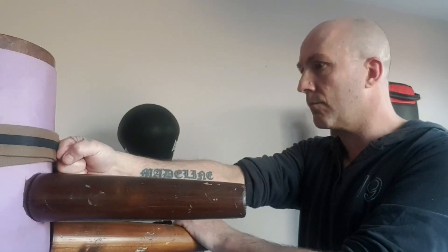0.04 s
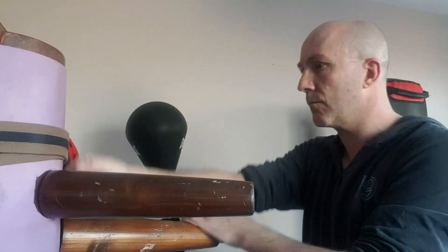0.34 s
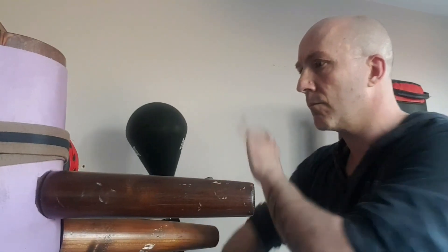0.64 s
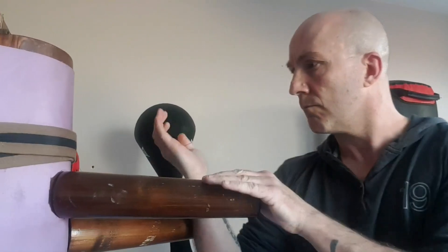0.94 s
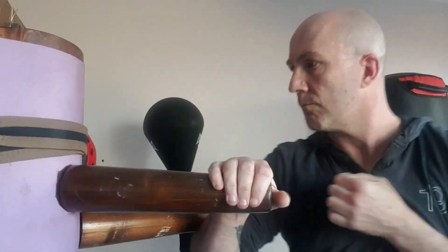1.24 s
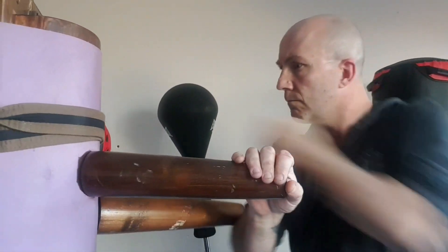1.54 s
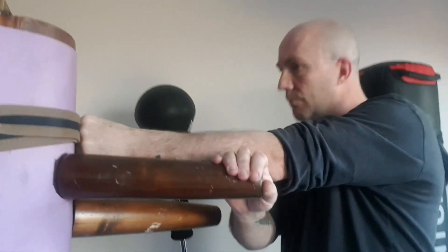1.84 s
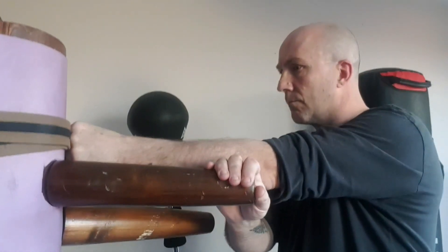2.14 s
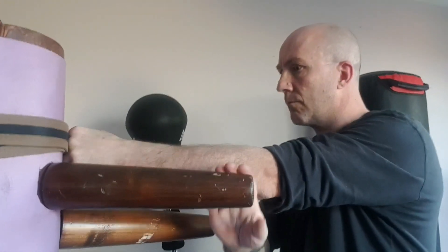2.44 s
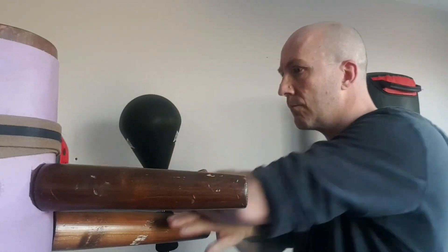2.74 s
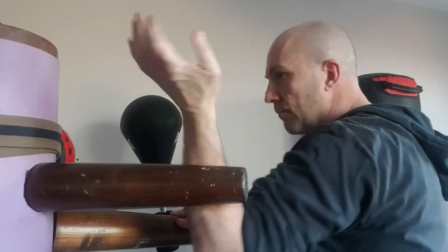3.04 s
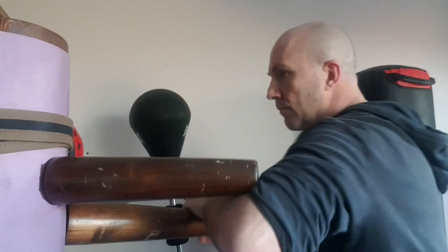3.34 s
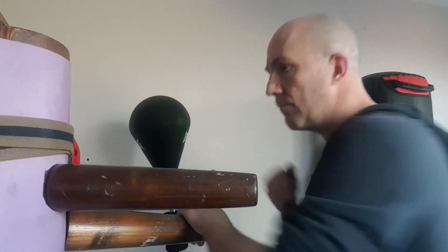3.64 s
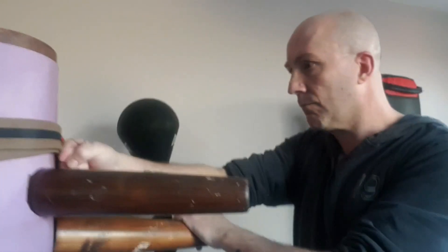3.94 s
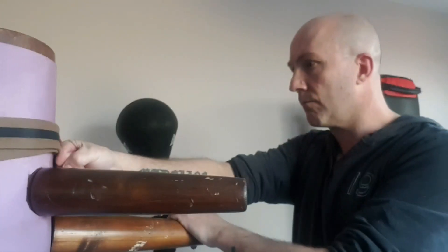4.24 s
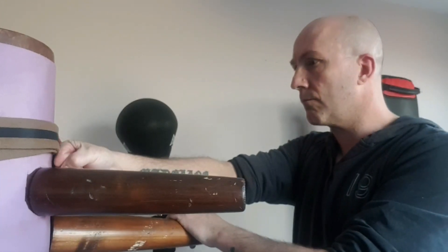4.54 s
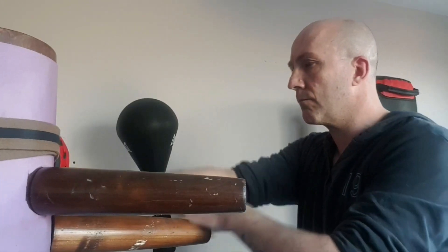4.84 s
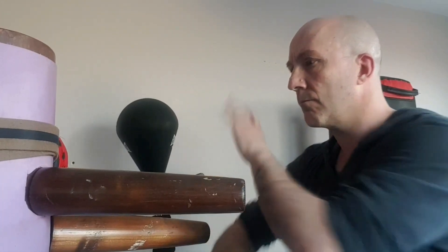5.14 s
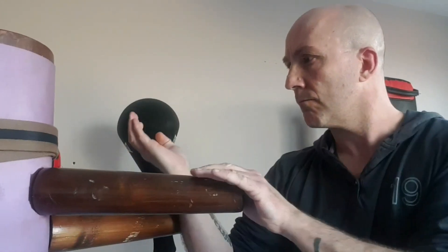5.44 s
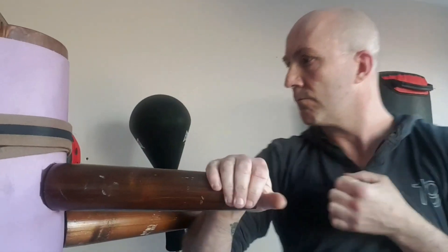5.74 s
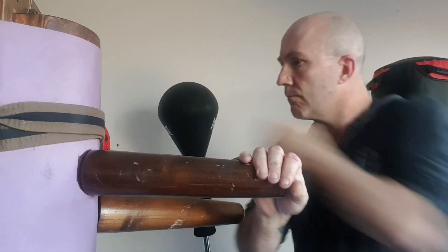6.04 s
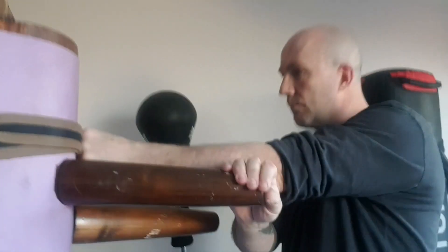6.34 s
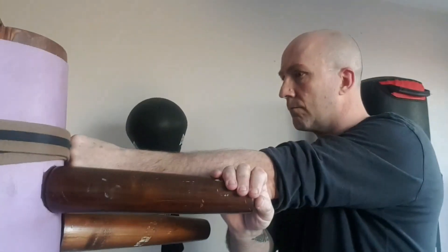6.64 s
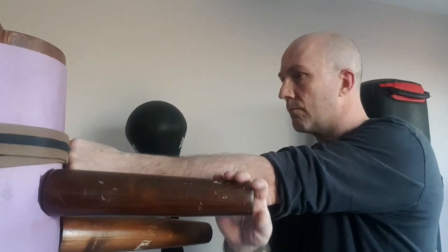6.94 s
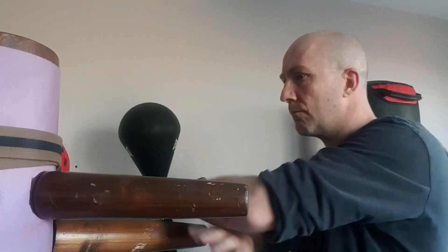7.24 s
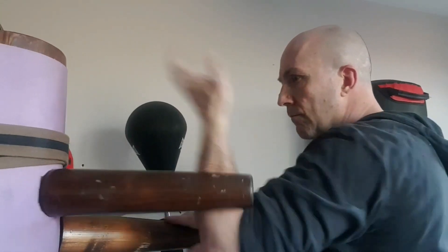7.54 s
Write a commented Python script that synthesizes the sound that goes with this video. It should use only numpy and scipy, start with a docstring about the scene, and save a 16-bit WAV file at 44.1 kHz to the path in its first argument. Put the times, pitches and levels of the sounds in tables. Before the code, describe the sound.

Someone drills on a wooden training dummy in a small, bare room. Forearms knock the loose wooden arms aside and skid along the varnish with slaps and brief squeaks. Three times, about two seconds apart, a fist follows with a deep thud on the padded trunk, which booms and sets the arms clattering. Sleeves rustle faintly between the blows. The microphone is close and picks up a short reverberation.

```python
"""Sleeves rustle and a hand brushes over wood; then knocks, slaps and squeaks follow as someone drills
on a wooden training dummy in a small, bare room. Impacts excite the modes of its loose arms, and skin
sliding on the varnish sounds by stick-slip friction. Three punches thud into the padded trunk, which
booms, sways on its mount and makes the arms clatter in their sockets. The walls reverberate."""
import sys
import numpy as np
from scipy import signal
from scipy.fft import rfft, irfft
from scipy.io import wavfile
from scipy.ndimage import uniform_filter1d

SR = 44100
rng = np.random.default_rng(int(sys.argv[2]) if len(sys.argv) > 2 else 0)


def generate_wav(sig):
    """Save sig (samples, or channels by samples) to the path in sys.argv[1] as 16-bit PCM at SR."""
    pcm = np.round(np.clip(np.atleast_2d(sig).T, -1, 1) * 32767).astype(np.int16)
    wavfile.write(sys.argv[1], SR, pcm)


N = 339129
T = np.arange(N) / SR
HZ = np.maximum(np.fft.rfftfreq(N, 1 / SR), 1)

# Reverberation time of the room: frequency_hz, t60_s
ROOM_T60 = [(60, 0.82), (250, 0.4), (800, 0.41), (2000, 0.39), (5000, 0.43), (14000, 0.26)]
# Left-right coherence of the diffuse field: frequency_hz, correlation
ROOM_COHERENCE = [(60, 0.73), (140, 0.8), (400, 0.67), (900, -0.096), (2000, -0.4), (14000, 0.94)]
# Spectral envelopes of the noise-like sounds: frequency_hz, relative_level_db
AIR_SPECTRUM = [(25, -19), (50, 5.5), (100, -5), (280, -14), (500, -11.5), (800, -2.5), (1400, -13.5),
                (3000, -14), (5000, -13.5), (9000, -16.5), (15000, -14.5)]
LINGER_SPECTRUM = [(250, -19), (550, -14.5), (750, -6.5), (1000, -8), (1400, -11.5), (8000, -37)]
CLOTH_SPECTRUM = [(40, -2.5), (320, 2.5), (500, 5), (850, 8), (1400, 3), (3000, 0), (4800, 0), (7000, -4),
                  (8700, -10), (12000, -1.5), (15000, -17)]
SNAP_SPECTRUM = [(200, -7.5), (800, 7.5), (1800, 1.5), (3000, 0.5), (6500, -1), (8500, -8.5), (12000, -3),
                 (15000, -14)]
PAT_SPECTRUM = [(30, 2.5), (70, -5), (130, -4.5), (250, -7.5), (500, -17), (1200, -18), (5000, -49.5)]
SLAP_SPECTRUM = [(80, -19.5), (330, -12), (480, -4), (800, 5), (1050, -2.5), (1450, 1), (1850, -5),
                 (2350, 1.5), (3000, -1.5), (4200, -5.5), (6500, -14), (9000, -26), (15000, -39)]
CLATTER_SPECTRUM = [(60, -21), (130, -7.5), (250, -9.5), (370, -10.5), (700, 0.5), (1000, -1), (1600, -6.5),
                    (2500, -9.5), (4000, -25), (6500, -35), (9000, -48.5), (15000, -41.5)]
# Normal modes of the trunk's sway, the arms and the padded trunk: frequency_hz, level_db, t60_s
SWAY_MODES = [(49.2, -4, 0.91), (95, -9.5, .75)]
ARM_MODES = [(446, -7, 0.38), (488, -7.5, 0.11), (554, -6.5, 0.11), (644.3, -8, 0.28), (728, -12, 0.076),
             (780.4, -4, 0.13), (829.4, 3.5, 0.12), (894, -0.5, 0.069), (1008.4, -5.5, 0.17),
             (1110, -16.5, .15), (1370, -19.5, 0.093), (1396, -13, .15), (1625, -10.5, 0.2),
             (1620, -21.5, 0.14), (2300, -10, 0.065), (3040, -13.5, .06)]
TRUNK_MODES = [(93.1, -9, 0.8), (126.4, -1, 0.31), (156.7, 5.5, 0.28), (229.5, -3.5, 0.28),
               (289.5, -5.5, 0.54)]
# Sleeve movements within one round of the drill: centre_s, level_db, half_length_s
SLEEVE_MOVES = [(.01, -66.5, 0.065), (0.436, -56, 0.079), (0.725, -64.5, 0.11), (1.261, -52.5, 0.11),
                (2.303, -68, 0.24), (2.475, -59.5, .095), (3.032, -52.5, 0.09), (3.345, -53, 0.14)]
# Skin snapping on or off the varnish, and clicks of the fittings:
# start_s, level_db, decay_s, tilt_db_per_octave
SNAPS = [(.752, -43, 0.022, 4.5), (1.1066, -42.5, 0.0014, -2.5), (1.1972, -38, 0.0034, 2),
         (1.647, -46, 0.023, -0.5), (2.2177, -47.5, 0.0043, 2), (2.473, -52, 0.0039, 2.5),
         (3.353, -33.5, .011, 1), (4.31, -48.5, 0.0034, -3), (5.565, -39.5, 0.0043, -0.5),
         (6.084, -50.5, 0.0087, -5), (6.364, -32.5, 0.0026, -2.5), (6.9051, -37, .0028, 0),
         (7.2129, -55, .0027, 1), (7.479, -39, 0.0051, 0.5)]
# A fist slides back off the dummy: start_s, level_db
SWIPES = [(0.483, -48.5), (5.022, -48.5)]
# A forearm leans on the wood: start_s, level_db
PRESSES = [(2.25, -49.5), (2.961, -50), (3.04, -42), (3.225, -49.5), (3.398, -43.5), (6.905, -57)]
# A palm comes down on the upper arm and pulls: start_s, level_db
GRABS = [(1.198, -39), (5.672, -42.5)]
# A hand rubs along an arm: start_s, level_db, rise_s, pitch_hz
RUBS = [(.435, -46.5, .024, 2110), (1.854, -29.5, 0.0025, 2960), (2.6, -64, .02, 1015),
        (3.262, -43, 0.024, 2300), (3.46, -33, .037, 2333), (3.642, -28.5, 0.0013, 2300),
        (7.1, -57.5, 0.0206, 1000)]
# A tugged or jogged arm knocks once in its socket: start_s, level_db, contact_s
SOCKET_KNOCKS = [(1.6435, -32, 0.0012), (2.239, -38.5, .0002), (2.920, -37.5, 0.0012),
                 (6.1335, -26, 0.00032), (6.1605, -12.5, .00063), (6.505, -48, 0.00065), (7.48, -49, .0003)]
# A forearm knocks an arm aside and skids along it:
# start_s, knock_db, skid_delay_s, skid_db, rise_s, tilt_db_per_octave, end_stop_db, sway_db, snap_db
PARRIES = [(0.7537, -27, 0.05, -24, .046, 2.5, -16.5, -34.5, -43),
           (3.005, -34, 0.055, -27.5, .0085, -0.4, -32.5, -54, -51),
           (5.256, -23, .038, -25, .049, 2, -20.5, -32.5, -30.5),
           (7.591, -19.5, 0.03, -32.5, .008, -1, -38, -46.5, -54)]
# A fist strikes the pad: start_s, thud_db, pad_hz, clatter_db, clatter_decay_s,
# clatter_tilt_db_per_octave, knock_db, contact_s, sway_db, snap_db
PUNCHES = [(1.682, -11, 126.4, -16, 0.016, 1, -10.5, 0.00085, -36.5, -40),
           (3.840, -10, 152.7, -11, 0.017, -2.5, -18.5, 0.0011, -33, -33),
           (6.167, -8.5, 125, -13.5, 0.012, 0.2, -10, 0.00072, -35.5, -28.5)]

ROUND_S, TICKS_PER_S = 4.485, 4
JOLT_LAG_S, SWAY_LAG_S = .004, .008  # the arms and the trunk respond after the blow
SKID_DECAY_S, SKID_WOOD_DB = .029, -16.5  # the wood's ring is relative to the skid
SKID_SQUEAK_HZ, SKID_SWELL_S, RUB_BODY_HZ = 3030, .0065, 845.6
BOUNCE_S, BOUNCE_DB = .016, -6.5  # interval and level step between rebounds


def undb(db):
    """Amplitude ratio of a level in decibels."""
    return 10 ** (np.asarray(db) / 20)


def read(points, hz):
    """Linear interpolation on a log-frequency axis."""
    frequencies, values = np.transpose(points)
    return np.interp(np.log(hz), np.log(frequencies), values)


def unit(x):
    """Normalisation to unit energy."""
    return x / np.sqrt(np.sum(x ** 2))


def add(track, s, x):
    """Superposition: a sound joins the track at s seconds."""
    i = int(s * SR)
    track[i:i + len(x)] += x[:N - i]


def fade(t, t60):
    """Exponential decay, by 60 dB in t60 seconds."""
    return np.exp(-np.log(1000) * t / t60)


def colour(x, spectrum, tilt_db=0, size=4096):
    """Minimum-phase filtering at unit energy, tilted by tilt_db per octave above 400 Hz."""
    hz = np.maximum(np.fft.rfftfreq(size, 1 / SR), 1)
    db = read(spectrum, hz) + tilt_db * np.log2(np.maximum(hz, 400))
    cepstrum = irfft(np.log(undb(db)))[:size // 2]
    cepstrum[1:] *= 2  # folding the cepstrum makes the filter causal
    response = unit(irfft(np.exp(rfft(cepstrum, size))))
    return signal.fftconvolve(x, response)[:max(len(x), min(len(x) + size, N))]


def ring(modes, length_s, scatter_db=0):
    """Free vibration: a sum of damped modes whose strengths vary with the point struck."""
    t = T[:int(length_s * SR)]
    gains = undb(scatter_db * rng.standard_normal(len(modes)))
    return sum((-1) ** k * gains[k] * undb(db) * np.sin(2 * np.pi * hz * t) * fade(t, t60)
               for k, (hz, db, t60) in enumerate(modes))


def push(x, contact_s):
    """A compliant contact spreads the force in time and so acts as a low-pass filter."""
    t = T[:SR // 20]
    force = t * np.exp(-2 * np.pi * t / contact_s)
    return signal.fftconvolve(x, force / force.sum())


def contacts(rise_s, decay_s, grain_db):
    """Many tiny contacts of uneven size add incoherently to a burst of noise."""
    t = T[:SR // 3]
    envelope = np.minimum(t / rise_s, 1) * np.exp(-np.maximum(t - rise_s, 0) / decay_s)
    sizes = np.repeat(undb(grain_db * rng.standard_normal(len(t))), 32)[:len(t)]
    return unit(rng.standard_normal(len(t)) * sizes * envelope) * np.sqrt(np.sum(envelope ** 2))


def diffuse():
    """Diffuse field: noise from all sides, its left-right coherence depending on frequency."""
    mid, side = rfft(rng.standard_normal((2, N)))
    coherence = read(ROOM_COHERENCE, HZ)
    mid *= np.sqrt((1 + coherence) / 2)
    side *= np.sqrt((1 - coherence) / 2)
    return irfft(np.array([mid + side, mid - side]), N)


def air():
    """Ambient noise: the steady diffuse background of a still room."""
    return np.array([colour(channel, AIR_SPECTRUM) for channel in diffuse()])


def room():
    """Reverberation: dense wall reflections build up, then each octave decays at its own rate."""
    t, spectrum = T[:SR], rfft(diffuse()[:, :SR])
    centres_hz = 62.5 * 2. ** np.arange(9)
    hz = np.maximum(np.fft.rfftfreq(SR, 1 / SR), 1)
    tail = 0
    for centre, band in zip(centres_hz, np.eye(len(centres_hz))):
        weight = np.interp(np.log(hz), np.log(centres_hz), band)
        tail += irfft(spectrum * weight, SR) * fade(t, read(ROOM_T60, centre))
    build_up = np.clip((t - .002) / .008, 0, 1)
    return np.sqrt(2) * unit(tail * build_up)


def linger():
    """Late decay: the impulse response of a hollow mid-range ring that outlasts the room's tail."""
    tails = diffuse()[:, :2 * SR] * fade(T[:2 * SR], t60=1.404)
    return np.array([unit(colour(tail, LINGER_SPECTRUM)) for tail in tails])


def place(x, walls, direct_db, wet_db, lag_ms, pan_db):
    """Direct and reverberant fields add; a delay on the left and a level difference give direction."""
    left = irfft(rfft(x) * np.exp(-2j * np.pi * HZ * lag_ms / 1000), N)
    reflected = signal.fftconvolve(x[None], walls, axes=1)[:, :N]
    both = undb(direct_db) * np.array([left, x]) + undb(wet_db) * reflected
    return both * undb(np.array([[pan_db], [-pan_db]]) / 2)


def movement():
    """Incoherent sources add in power: one Gaussian swell for each sleeve movement."""
    return sum(undb(2 * db) * np.exp(-((T - s) / half_s) ** 2) for s, db, half_s in drill("brush"))


def sleeves():
    """Friction noise: fibres catch and slip with each movement, and folds modulate the level."""
    catches = np.repeat(undb(4 * rng.standard_normal(N // 64 + 1)), 64)[:N]
    folds = uniform_filter1d(rng.standard_normal(N), size=900)
    friction = rng.standard_normal(N) * catches * undb(2 * folds / folds.std())
    return colour(friction, CLOTH_SPECTRUM) * np.sqrt(movement())


def stray_ticks():
    """A random point process: rows of faint snaps whose level follows the sleeve movement."""
    level_db = 10 * np.log10(movement() + 1e-12)
    moments = rng.integers(0, N, int(TICKS_PER_S * N / SR))
    return [(T[i], level_db[i] - 5.5, .0027, 0) for i in moments]


def snaps():
    """Abrupt contacts have broad spectra and are heard as bright clicks."""
    out = np.zeros(N)
    for s, db, decay_s, tilt_db in SNAPS + drill("snap") + stray_ticks():
        burst = undb(db) * contacts(.0003, decay_s, grain_db=4)
        add(out, s, colour(burst, SNAP_SPECTRUM, tilt_db))
    return out


def pats():
    """Soft impact: the weight of hand and forearm excites mostly low frequencies."""
    out = np.zeros(N)
    for s, db, decay_s in drill("pat"):
        burst = undb(db) * contacts(.006, decay_s, grain_db=.5)
        add(out, s, colour(burst, PAT_SPECTRUM))
    return out


def sway():
    """Damped oscillation: every shove rocks the trunk on its mount."""
    out = np.zeros(N)
    boom = push(ring(SWAY_MODES, 1.8), contact_s=.0044)
    for s, db in drill("shove"):
        add(out, s, undb(db) * boom)
    return out


def squeaks():
    """Stick-slip oscillation: nearly periodic slips give a wavering tone and its octave."""
    out, t = np.zeros(N), T[:SR // 5]
    for s, hz, db, swell_s in drill("squeak"):
        waver = uniform_filter1d(rng.standard_normal(len(t)), size=96)
        phase = 2 * np.pi * np.cumsum(hz * (1 + .033 * waver / waver.std())) / SR
        envelope = t / swell_s * np.exp(1 - t / swell_s)
        add(out, s, undb(db) * envelope * (np.sin(phase) + .15 * np.sin(2 * phase)))
    return out


def slaps():
    """Sliding friction: skin lands and skids on the varnish, and its slips drive the arm's modes."""
    out = np.zeros(N)
    for s, db, rise_s, decay_s, tilt_db, wood_db in drill("slap"):
        skid = undb(db) * contacts(rise_s, decay_s, grain_db=1)
        wood = unit(ring(ARM_MODES, .5, scatter_db=3.5))
        add(out, s, colour(skid, SLAP_SPECTRUM, tilt_db))
        add(out, s, undb(wood_db) * signal.fftconvolve(skid, wood))
    return out


def knocks():
    """Impact excitation: wood meets wood with a dull crack, and the arm rings in its modes."""
    out = np.zeros(N)
    for s, db, contact_s in SOCKET_KNOCKS + drill("knock"):
        wood = ring(ARM_MODES, .5, scatter_db=3.5)
        grip = .35 + np.exp(-T[:len(wood)] / .007)  # the hand damps the arm at once
        knock = push(wood * grip, contact_s)
        crack = undb(db - 12.5) * contacts(.00043, .0067, grain_db=.5)
        add(out, s, undb(db) * knock / np.abs(knock).max())
        add(out, s, colour(crack, CLATTER_SPECTRUM))
    return out


def clatter():
    """Repeated collisions: jolted by a punch, the loose arms rattle and ring in their sockets."""
    out = np.zeros(N)
    for s, _, _, db, decay_s, tilt_db, *_ in PUNCHES:
        rattle = undb(db) * contacts(.0012, decay_s, grain_db=4)
        wood = unit(ring(ARM_MODES, .5, scatter_db=1))
        add(out, s, colour(rattle, CLATTER_SPECTRUM, tilt_db))
        add(out, s, undb(-12.5) * push(signal.fftconvolve(rattle, wood), contact_s=.0005))
    return out


def thuds(pad_db=10, pad_t60_s=.24):
    """Cushioned impact: the pad yields to the fist, resonates and drives the trunk's low modes."""
    out = np.zeros(N)
    for s, db, pad_hz, *_ in PUNCHES:
        trunk = ring(TRUNK_MODES, 1, scatter_db=.5)
        pad = ring([(pad_hz, pad_db, pad_t60_s)], 1)
        thud = push(trunk + pad, contact_s=.0046)
        add(out, s + .004, undb(db) * thud / np.abs(thud).max())
    return out


def rounds(count=2):
    """Periodic motion: the sleeves repeat their movements in every round."""
    for k in range(count):
        for s, db, half_s in SLEEVE_MOVES:
            yield "brush", k * ROUND_S + s, db, half_s


def holds():
    """Weak forcing: grabs and presses rock the trunk, while swipes only graze it."""
    for s, db in GRABS:
        yield "pat", s, db, .012
        yield "knock", s, db + 2, .0021
        yield "slap", s, db - 6, .0015, SKID_DECAY_S, 2.1, -22
        yield "shove", s + SWAY_LAG_S, db + .5
    for s, db in PRESSES:
        yield "pat", s, db, .029
        yield "shove", s + SWAY_LAG_S, db - 9
    for s, db in SWIPES:  # a bright hiss over a faint pat
        yield "snap", s, db, .036, .5
        yield "pat", s, db - 6.5, .036


def rubs():
    """Friction-driven vibration: skin and arm sing as the pressure builds, longest in slow rubs."""
    for s, db, rise_s, hz in RUBS:
        yield "slap", s, db, rise_s, .019, .36, -9
        swell_s = .42 * rise_s
        yield "squeak", s + swell_s, hz, db - .5, swell_s
        yield "squeak", s + swell_s, RUB_BODY_HZ, db - 1.5, swell_s  # near the arm's strongest mode


def parries(bounces=2):
    """Inelastic collision: the arm rebounds ever more weakly, then a skid drives it to its end stop."""
    for s, knock_db, wait_s, skid_db, rise_s, tilt_db, stop_db, sway_db, snap_db in PARRIES:
        yield "knock", s, knock_db, .0006
        for k in range(1, bounces + 1):
            yield "knock", s + k * BOUNCE_S, knock_db + k * BOUNCE_DB, .00076
        yield "slap", s, skid_db - 13, .003, .05, -4.5, SKID_WOOD_DB  # a scuff before the skid
        skid_s = s + wait_s
        yield "squeak", skid_s, SKID_SQUEAK_HZ, skid_db - 4, SKID_SWELL_S
        # every other slip is stronger, which adds a subharmonic
        yield "squeak", skid_s, SKID_SQUEAK_HZ / 2, skid_db - 9, SKID_SWELL_S
        yield "slap", skid_s, skid_db, rise_s, SKID_DECAY_S, tilt_db, SKID_WOOD_DB
        stop_s = skid_s + .45 * rise_s  # the arm reaches the end of its play
        yield "knock", stop_s, stop_db, .00045
        yield "pat", stop_s, stop_db - 15, .016  # the forearm's weight follows
        yield "snap", stop_s, snap_db, .032, -1.5
        yield "shove", stop_s + SWAY_LAG_S, sway_db


def punches():
    """Momentum transfer: the fist lands and jolts the arms and the trunk."""
    for s, thud_db, *_, knock_db, contact_s, sway_db, snap_db in PUNCHES:
        yield "brush", s - .05, -59.5, .07  # the sleeve winds up
        yield "pat", s - .008, thud_db - 10, .013  # flesh meets the pad before the thud
        yield "knock", s + JOLT_LAG_S, knock_db, contact_s
        yield "snap", s + JOLT_LAG_S, snap_db, .064, -2
        yield "shove", s + SWAY_LAG_S, sway_db
        yield "brush", s + .19, -56, .17  # the sleeve settles


def drill(kind):
    """The excitation of one source: rows for all contacts of that kind which the gestures make."""
    gestures = (punches, parries, rubs, holds, rounds)
    return [row for gesture in gestures for name, *row in gesture() if name == kind]


def scene():
    """Superposition of dummy, hands and sleeves in the room, over the ambient noise."""
    walls, rattle, wood, skin = room(), clatter(), knocks(), slaps()
    out = place(thuds(), walls, direct_db=-1, wet_db=-7.5, lag_ms=1, pan_db=1)
    out += place(rattle, walls, direct_db=4, wet_db=4.5, lag_ms=.2, pan_db=-2.5)
    out += place(wood, walls, direct_db=.5, wet_db=2, lag_ms=.27, pan_db=-3.5)
    out += place(sway(), walls, direct_db=7, wet_db=-24.5, lag_ms=.3, pan_db=-2)
    out += place(skin + squeaks(), walls, direct_db=1.5, wet_db=1.5, lag_ms=.13, pan_db=.5)
    out += place(pats(), walls, direct_db=5.5, wet_db=2.5, lag_ms=.22, pan_db=-.5)
    out += place(snaps(), walls, direct_db=1.5, wet_db=2, lag_ms=.018, pan_db=1.4)
    out += place(sleeves(), walls, direct_db=-3.5, wet_db=-3.5, lag_ms=0, pan_db=.5)
    out += undb(-23) * signal.fftconvolve((rattle + skin)[None], linger(), axes=1)[:, :N]
    return out + undb(-68) * air()


def record(dry, low_hz=41, top_hz=14750):
    """Saturation and band limiting: a nearby phone rounds the peaks and cuts rumble and top treble."""
    high_pass = signal.butter(10, low_hz, "high", fs=SR, output="sos")
    low_pass = signal.ellip(8, .2, 70, top_hz, fs=SR, output="sos")
    return signal.sosfilt(low_pass, signal.sosfilt(high_pass, np.tanh(dry)))


dry = scene()
out = record(dry)
generate_wav(out)
```